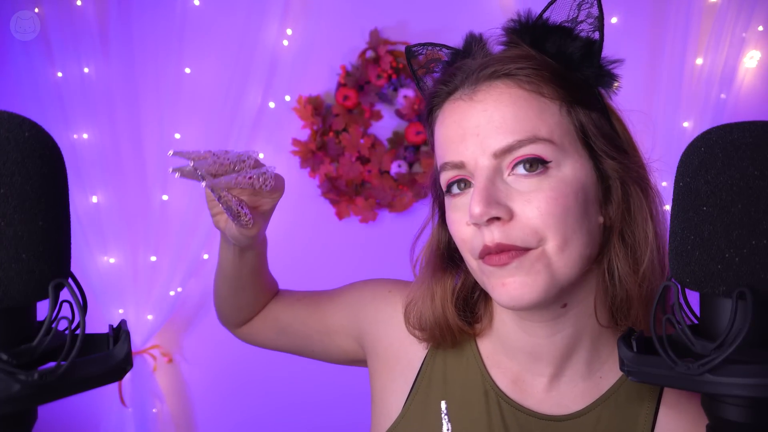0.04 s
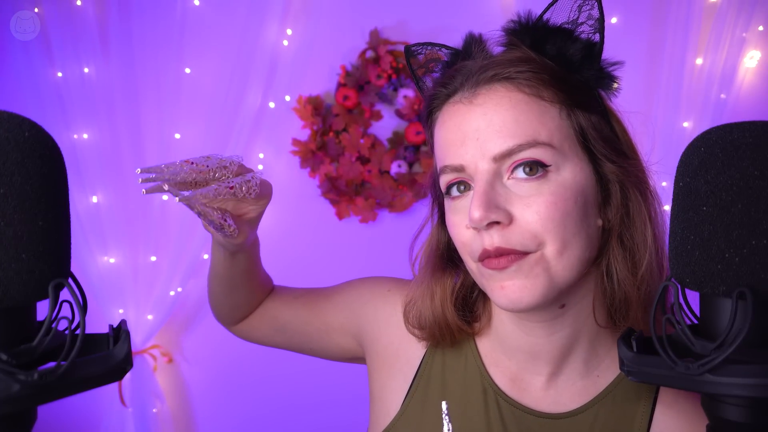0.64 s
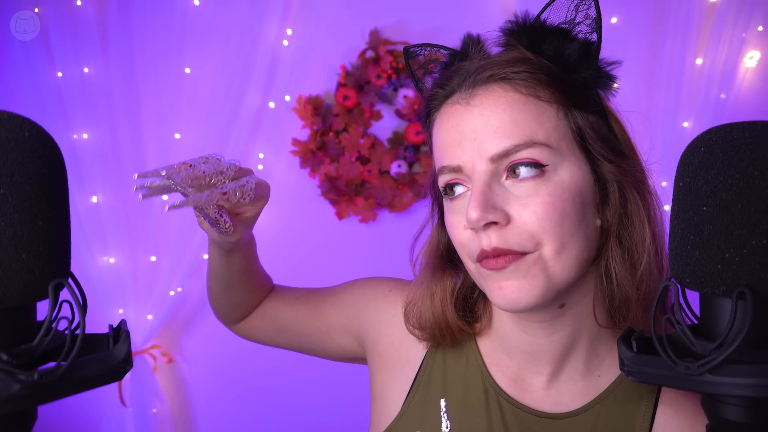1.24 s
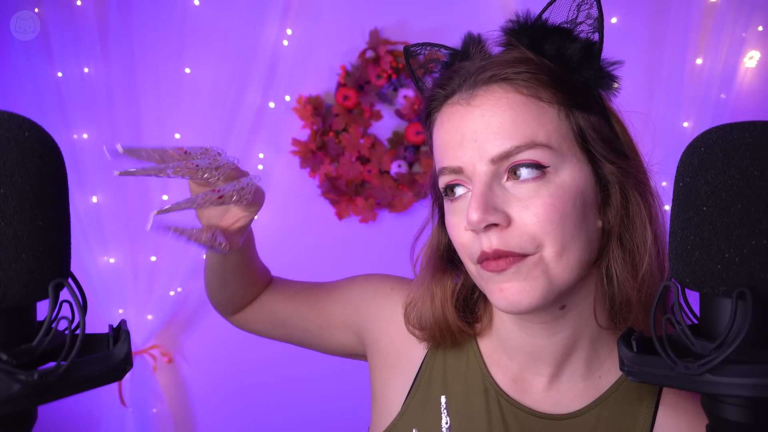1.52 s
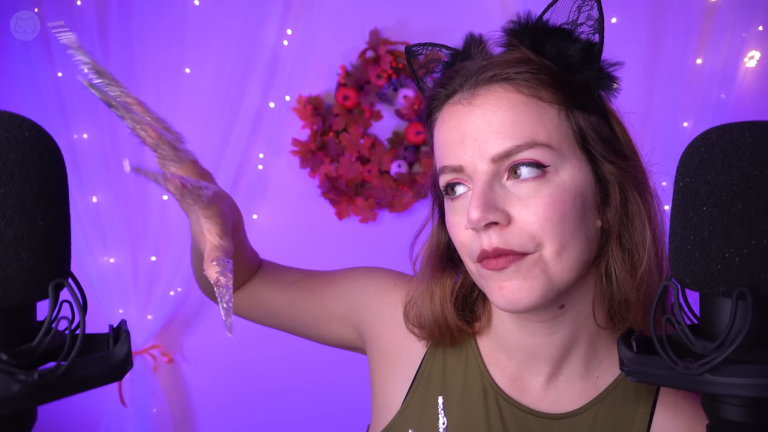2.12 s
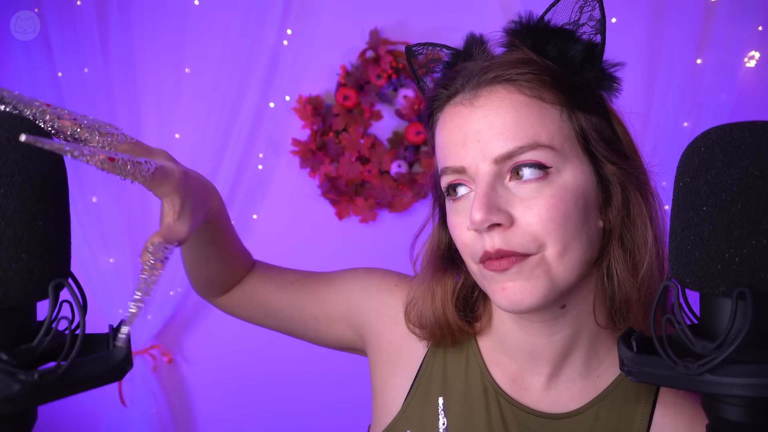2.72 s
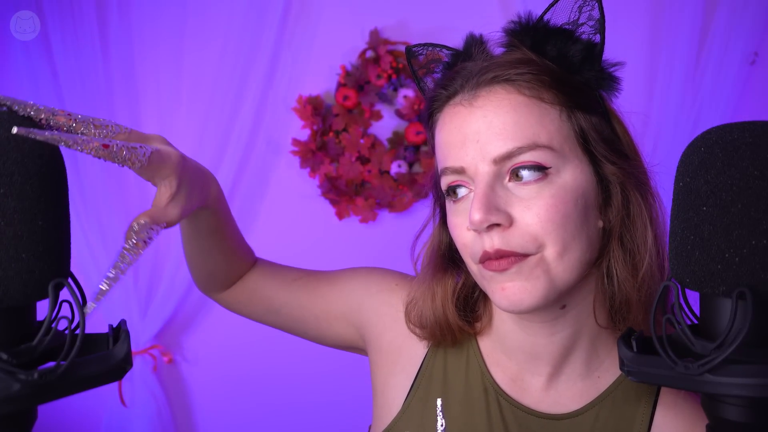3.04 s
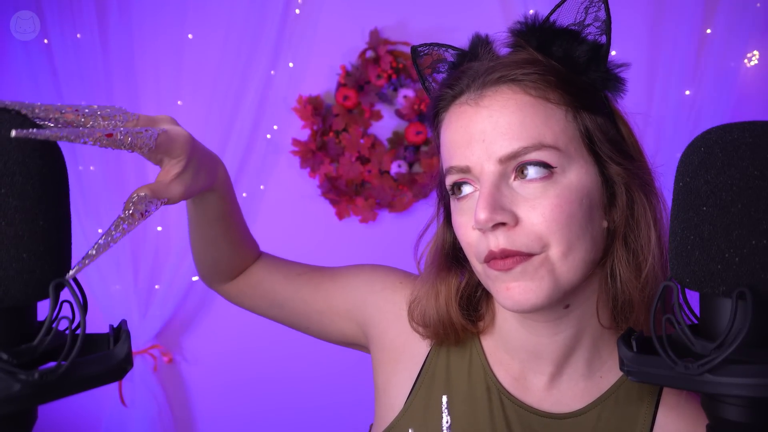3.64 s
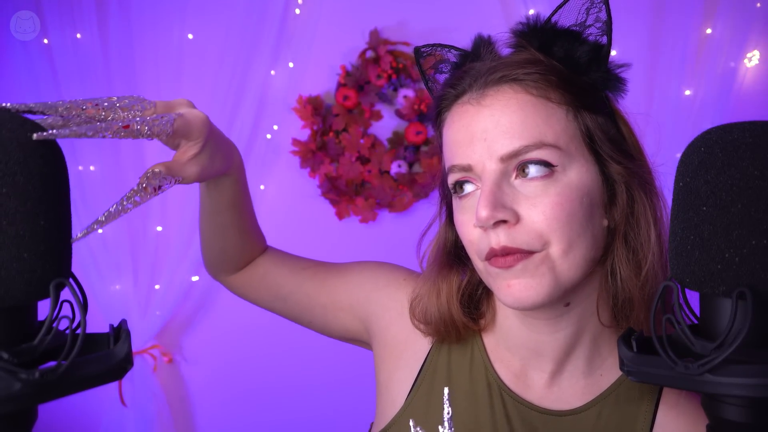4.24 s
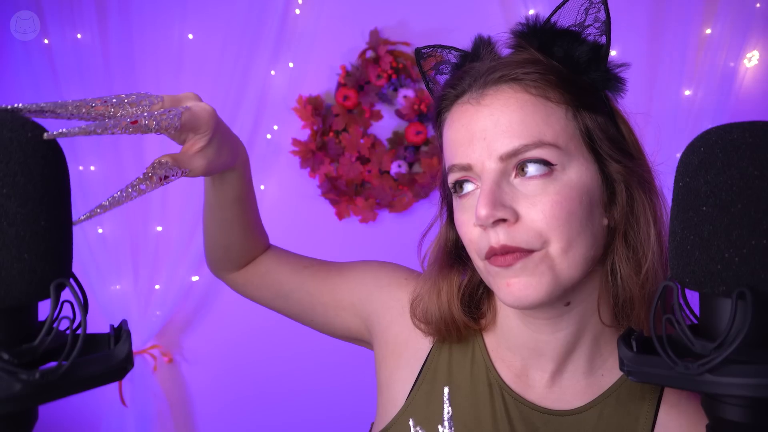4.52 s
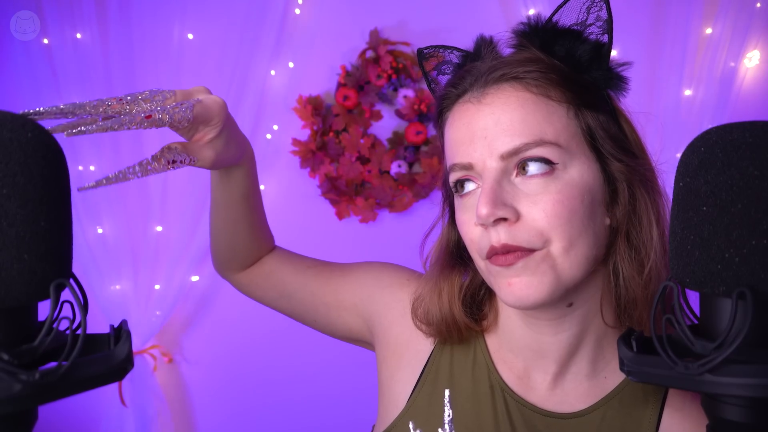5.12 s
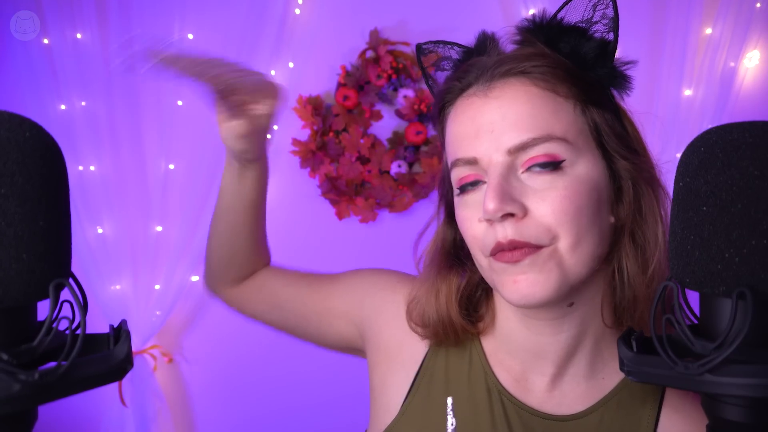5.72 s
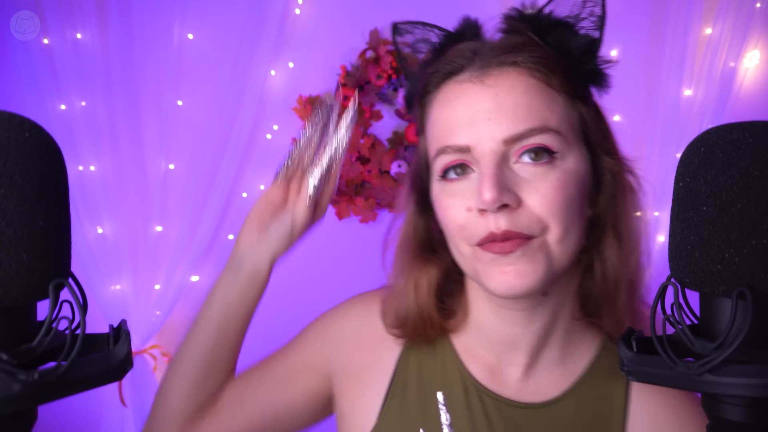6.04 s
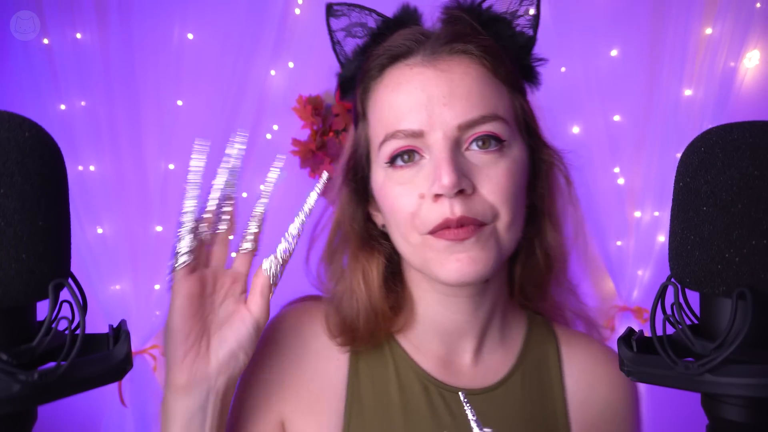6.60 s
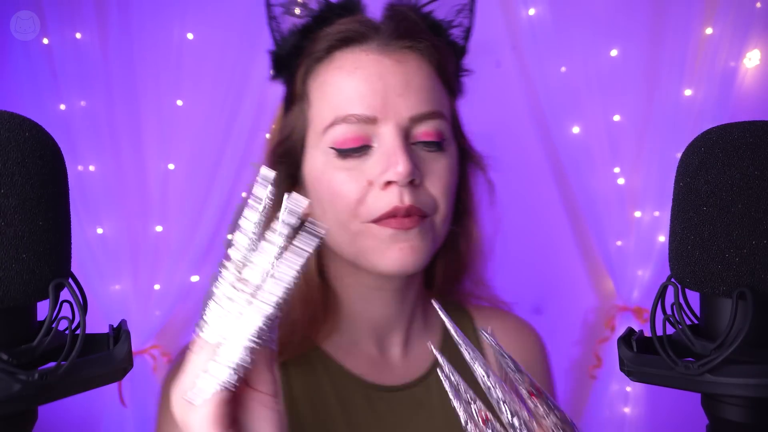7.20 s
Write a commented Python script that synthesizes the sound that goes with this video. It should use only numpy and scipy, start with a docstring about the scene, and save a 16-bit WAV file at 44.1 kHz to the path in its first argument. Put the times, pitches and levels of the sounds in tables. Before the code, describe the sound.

Hollow metal claw rings click and slide against each other in small, bright clusters, mostly on the left. After a pause, the claws drag over the foam cover of the left microphone in short pulls, rasping and crackling very close, with a deep rumble from its mount. They lift away, arms rustle faintly against hair and cloth, and the claws click and tinkle again. The room is quiet.

```python
"""A quiet room, where hollow metal claw rings click and slide together between two foam-covered microphones.
Impacts excite the claws' modes and cavities; ridges passing over ridges chatter. Then the claws drag
over the left microphone's foam: stick-slip friction makes it rasp and crackle, drives the resonances
of the body and shakes the springy mount. The hand draws back, the microphone's arm rocks and settles,
and the claws click again. Moving arms rustle against hair and cloth before and after the dragging."""
import sys
import numpy as np
from scipy import signal
from scipy.fft import rfft, irfft
from scipy.io import wavfile
from scipy.ndimage import uniform_filter1d

SR = 44100
rng = np.random.default_rng(int(sys.argv[2]) if len(sys.argv) > 2 else 0)


def persist_wave(psi):
    """Save psi, clipped to +-1, as 16-bit WAV."""
    counts = np.round(np.clip(psi, -1, 1) * 32767).astype(np.int16)
    wavfile.write(sys.argv[1], SR, np.atleast_2d(counts).T)


N = 325017
TIME = np.arange(N) / SR
TOUCH_S, LIFT_S = 2.89, 5.516  # the claws land on the foam and leave it

# Levels in all tables are relative: each source adds its own gain.
# sparkle near 12 kHz, lost while the claws are held beside the head: time_s, gain_db
SPARKLE = [(1.5, -6.5), (5.7, -4.5), (6.17, -9), (6.29, 0.5), (6.65, -8), (7.1, -2.5)]
# one claw slides along another: start_s, end_s, level_db
SLIDES = [(0.875, 0.939, -57), (1.28, 1.34, -48.5), (1.505, 1.558, -54.5), (5.684, 5.743, -47),
          (5.766, 5.84, -55), (5.89, 5.946, -60), (6.154, 6.202, -42), (6.248, 6.353, -44.5),
          (6.524, 6.594, -55.5), (6.625, 6.714, -47.5)]
# how the hand faces the microphones: time_s, left_over_right_db
HAND_PAN = [(0.9, 10), (1.3, 13), (1.55, -4), (5.7, 6), (5.8, 0), (5.9, 6), (6.17, -1), (6.28, 8),
            (6.6, -3), (7.2, 8.5)]
# pulls of the claws through the foam: start_s, end_s, friction_db
PULLS = [(2.896, 2.992, -64), (3.098, 3.138, -62), (3.271, 3.425, -63.5), (3.487, 3.505, -55.5),
         (3.612, 3.669, -55), (3.691, 3.747, -56), (3.777, 3.858, -59.5), (3.97, 4.243, -59.5),
         (4.267, 4.41, -56.5), (4.502, 4.563, -56), (4.621, 4.765, -57), (4.793, 4.877, -57),
         (4.904, 5.017, -55.5), (5.047, 5.135, -54), (5.187, 5.299, -58.5), (5.361, 5.416, -54),
         (5.413, 5.505, -49)]
# spectrum of a claw's edge rasping in the foam: frequency_hz, gain_db
RASP_SPECTRUM = [(500, -45), (1000, -2), (1400, 2.5), (1800, -4), (2300, -13.5), (3400, -15.5),
                 (6000, -26.5)]
# the sides of the claws glide over the foam without catching: time_s, friction_db
GLIDE_FRICTION = [(3.2, -85), (3.25, -73), (3.46, -78), (3.58, -63), (3.68, -61.5), (3.93, -60),
                  (4.03, -56), (4.2, -60.5), (4.25, -68), (4.31, -56.5), (4.48, -57), (4.66, -63.5),
                  (4.79, -74), (4.96, -66), (5.32, -74), (5.48, -65)]


def amp(db):
    """Decibels to amplitude ratio."""
    return 10 ** (np.asarray(db) / 20)


def unit_rms(x):
    """Normalisation to rms 1."""
    return x / np.sqrt(np.mean(x ** 2) + 1e-20)


def at_hz(points, hz):
    """Interpolation on a log-frequency axis."""
    knots_hz, values = np.transpose(points)
    return np.interp(np.log(hz + 1), np.log(knots_hz + 1), values)


def at_time(curve, s):
    """Linear interpolation of each column at time s."""
    times, *columns = np.transpose(curve)
    return [np.interp(s, times, column) for column in columns]


def add(mix, s, sound):
    """Superposition of a sound at time s."""
    part = mix[..., max(round(s * SR), 0):][..., :sound.shape[-1]]
    part += sound[..., :part.shape[-1]]


def colour(x, spectrum, size=2048):
    """Minimum-phase filtering: being causal, it keeps attacks sharp."""
    log_gain = np.log(amp(at_hz(spectrum, abs(np.fft.fftfreq(size, 1 / SR)))))
    taps = np.fft.ifft(np.exp(np.conj(signal.hilbert(log_gain)))).real
    return signal.fftconvolve(x, taps[:size // 2])[:len(x)]


def noise(spectrum):
    """Stationary Gaussian noise of a given spectrum, rms 1."""
    gain = amp(at_hz(spectrum, np.fft.rfftfreq(N, 1 / SR)))
    return unit_rms(irfft(rfft(rng.standard_normal(N)) * gain, N))


def grains(per_s, spread_db):
    """A Poisson train of impulses of uneven size."""
    size = amp(spread_db * np.minimum(rng.exponential(1, N), 4)) * rng.choice([-1, 1], N)
    return size * (rng.random(N) < per_s / SR)


def scatter(start, end, per_s):
    """Jittered times: one random moment in each equal part of a span."""
    count = max(round((end - start) * per_s), 1)
    return start + (end - start) * (np.arange(count) + rng.random(count)) / count


def swell(start, end):
    """A raised-cosine rise and fall."""
    return np.sin(np.pi * np.clip((TIME - start) / (end - start), 0, 1)) ** 2


def sides(pan_db):
    """A level difference as left and right gains of mean 1."""
    gains = amp([[pan_db / 2], [-pan_db / 2]])
    return gains / gains.mean()


def room_tone(air_db=-67, left_db=-41, right_db=-47, stirred_db=-37):
    """Uncorrelated air noise at each microphone, over the sway of the stands; draughts stir the left one."""
    # quiet air and the slow sway of the stands: frequency_hz, gain_db
    air_spectrum = [(35, -41), (60, -12.5), (142, -3), (168, -17), (202, -9), (227, -20), (268, -16),
                    (354, -22), (448, -22.5), (553, -19.5), (991, -21), (1510, -28), (3940, -32.5),
                    (16000, -33.5)]
    sway_spectrum = [(5, -17.5), (14, -7.5), (20, -9), (30, -29.5), (50, -36.5), (100, -51.5), (400, -110)]
    # the hand opens or swings and moves the air: start_s, end_s, level_db
    draughts = [(1.26, 2.07, 4.5), (5.297, 6.594, -3.5)]
    stirring = sum(amp(db) * swell(start, end) for start, end, db in draughts)
    sways = amp(left_db) + amp(stirred_db) * stirring, amp(right_db)
    return np.array([noise(air_spectrum) * amp(air_db) + noise(sway_spectrum) * sway for sway in sways])


def contact(decay_s, rise_s, size=512):
    """A brief contact gives a broadband force: a noise burst with exponential decay."""
    t = np.arange(size) / SR
    return rng.standard_normal(size) * np.exp(-t / decay_s) * (1 - np.exp(-t / rise_s))


def claw_response(forces, ring_db, vary_db=3.5, detune=0.0068):
    """Modal response: a direct snap plus damped modes whose strength depends on where the claw is struck."""
    # modes of a hollow claw: frequency_hz, level_db, t60_s
    modes = [(1070, 0, 0.05), (1856, 4, 0.028), (2400, 1, 0.022), (3190, 1, 0.035), (3900, -3, 0.025),
             (4590, 1, 0.025), (6490, 0, 0.035), (7800, -4, 0.05), (8150, -3, 0.055), (9400, 3, .05),
             (10400, -15, 0.17), (10400, -22, 0.037), (11900, -9, 0.07), (12800, -26, .11),
             (11600, -18, 0.17), (12400, -21, .11), (13270, -8, 0.075), (14600, -6, 0.072)]
    # spectrum of a claw's click: frequency_hz, gain_db
    click_spectrum = [(200, -21), (600, -21.5), (1500, -18.5), (2500, -18), (3800, -17), (5300, -14),
                      (6700, -8), (9000, -6), (10800, 0.5), (12200, 9), (13200, -2), (14500, -6.5),
                      (15700, -13), (17000, -56)]
    t = np.arange(SR // 6) / SR
    deviations = rng.standard_normal((len(modes), 2))
    tuning = rng.uniform(0.93, 1.035)  # no two claws are the same size
    ring = np.zeros(len(t))
    for (hz, db, t60), (strength, shift) in zip(modes, deviations):
        envelope = amp(ring_db + db + vary_db * strength - 60 * t / t60)
        ring += envelope * np.cos(2 * np.pi * hz * tuning * (1 + detune * shift) * t)
    ring[0] += 1  # the direct snap
    return np.array([colour(signal.fftconvolve(force, ring), click_spectrum) for force in forces])


def cavity_ring(hz, t60_s=0.015, rise_s=0.0003, size=2048):
    """Cavity resonance: a claw's hollow rings briefly at the pitch of the struck place, with energy 1."""
    t = np.arange(size) / SR
    envelope = amp(-60 * t / t60_s) * (1 - np.exp(-t / rise_s))
    return unit_rms(np.sin(2 * np.pi * hz * t) * envelope) / np.sqrt(size)


def claw_clicks(gain_db=16.5, low_gain_db=19, cavity_db=-3, unshared=0.62, delay_s=0.00058, lag_s=0.0008):
    """Impacts excite the modes and cavity of a claw; the sound reaches the right microphone lag_s later."""
    # claw meets claw: time_s, level_db, clack_db, cavity_hz, left_over_right_db
    impacts = [(0.3147, -41.5, -20.5, 1570, 10), (0.3315, -45, -18, 2960, 13),
               (0.384, -33.5, -19, 2430, 10), (0.391, -29.5, -24, 1680, 8), (0.3975, -34.5, -22, 1610, 17),
               (0.4117, -41, -28, 1600, 13), (0.494, -36, -33, 960, 13), (0.5036, -33.5, -28.5, 1010, 4),
               (0.509, -38, -31, 1030, 14), (0.5162, -37.5, -32, 1150, 14), (0.769, -45.5, -17, 1600, 10),
               (0.7856, -24.5, -15, 2430, 11), (0.7977, -32.5, -16.5, 1190, 11),
               (0.8801, -25, -20, 2130, 8), (0.9012, -30.5, -24, 1680, 14), (0.919, -39, -23, 960, 9),
               (1.23, -41, -13.5, 1570, 9), (1.2701, -24.5, -21, 1630, 16), (1.279, -38, -17, 1660, 12),
               (1.2948, -30.5, -22.5, 1620, 11), (1.3151, -31, -30, 2010, 14), (1.33, -41, -32, 2690, 10),
               (1.398, -31.5, -20.5, 3180, 15), (1.4066, -32, -15.5, 1090, 6), (1.441, -35, -20, 2600, 9),
               (1.502, -23, -29.5, 2560, 9), (1.506, -23, -30, 2430, 6), (1.531, -29, -23, 1420, 8),
               (1.5416, -25.5, -23.5, 2480, 11), (1.55, -30, -29, 2430, 9), (2.4382, -41, -14, 2050, -3),
               (5.685, -25, -19.5, 3300, 5), (5.6962, -28, -18, 3230, 8), (5.7128, -28, -24, 1580, 9),
               (5.7225, -42, -15, 2260, 0), (5.7745, -37, -17, 1860, -1), (5.783, -34.5, -22, 2570, 9),
               (5.7986, -34, -21.5, 1840, -4), (5.814, -39, -30, 1200, -1), (5.888, -31, -17.5, 1120, 4.5),
               (5.9243, -46, -15, 945, 5), (5.934, -45, -16, 1510, 0), (6.1599, -30.5, -22, 1930, 2),
               (6.1719, -26.5, -27, 1830, -10), (6.213, -33.5, -20, 1890, -1), (6.2541, -35, -21, 2350, 19),
               (6.2893, -29.5, -22, 3170, 12), (6.3109, -29, -20, 3110, 13), (6.3181, -31, -16, 3150, 7),
               (6.3363, -39, -17, 2490, 9), (6.4677, -44, -21, 2770, 5), (6.5485, -35, -28, 1900, -4),
               (6.5564, -38, -24, 2840, -2), (6.6137, -34.5, -19, 1908, -6),
               (6.6487, -35, -16.5, 2247, -14), (7.108, -43, -12.5, 2940, 7),
               (7.1618, -31.5, -18.5, 2170, 7.5), (7.2257, -40.5, -12, 2270, 2),
               (7.2516, -36.5, -14.5, 2360, 8), (7.354, -29.5, -18.5, 1700, 6)]
    out = np.zeros((2, N))
    for s, level_db, clack_db, cavity_hz, pan_db in impacts + claw_skips():
        (top_db,) = at_time(SPARKLE, s)
        low_db = clack_db + low_gain_db
        mid_db = 0.51 * low_db  # the middle band partly follows the clack
        tone = [(2500, low_db), (4000, low_db), (5500, mid_db), (8500, mid_db),
                (10500, 0), (12000, top_db), (14000, 0)]
        left_force = contact(decay_s=0.00058, rise_s=0.0001)
        right_force = left_force * (1 - unshared) + contact(decay_s=0.0022, rise_s=0.00012) * unshared
        pair = claw_response([left_force, right_force], ring_db=-41.5)
        pair = np.array([colour(side, tone, size=512) for side in pair])
        pair /= np.linalg.norm(pair, axis=1, keepdims=True)
        add(pair, 0, cavity_ring(cavity_hz) * amp(clack_db + cavity_db))
        pair *= sides(pan_db) * amp(level_db + gain_db)
        add(out[0], s + delay_s, pair[0])
        add(out[1], s + delay_s + lag_s, pair[1])
    return out


def reverberation(x, wet_db=-13, gap_s=0.0013, echoes_per_s=5000):
    """A diffuse field: sparse reflections, equally loud on both sides, die fastest in the top treble."""
    # reverberation time of the room: frequency_hz, t60_s
    decay_times = [(500, 0.22), (2500, 0.37), (7000, 0.23), (12000, 0.17), (16000, 0.036)]
    echoes = rng.choice([-1., 1.], (2, SR // 2)) * (rng.random((2, SR // 2)) < echoes_per_s / SR)
    echoes[:, :round(gap_s * SR)] = 0
    hz, t, spectra = signal.stft(echoes, SR, nperseg=256)
    decay = amp(-60 * t / at_hz(decay_times, hz)[:, None])
    _, tail = signal.istft(spectra * decay, SR, nperseg=256)
    tail /= np.linalg.norm(tail[0])
    return amp(wet_db) * signal.fftconvolve(x.mean(0)[None], tail, axes=1)[:, :N]


def claw_slides(gain_db=-1, fade_db=3.5, top_db=-3.5, trip_s=0.0005, steady=0.22, lag_s=0.00073):
    """Roughness excitation: the ridges of two claws trip over each other hundreds of times a second."""
    trip = np.exp(-np.arange(256) / SR / trip_s)
    roughness = signal.fftconvolve(abs(grains(per_s=900, spread_db=3)), trip)[:N] + steady
    chatter = roughness * rng.standard_normal((2, N))
    out = np.zeros((2, N))
    for start, end, db in SLIDES:
        (pan_db,) = at_time(HAND_PAN, (start + end) / 2)
        (sparkle_db,) = at_time(SPARKLE, start)
        force = chatter[:, round(start * SR):round(end * SR)]
        size = force.shape[1]
        envelope = amp(np.linspace(0, -fade_db, size)) * signal.windows.tukey(size, 0.15)
        tone = [(8000, 0), (11500, sparkle_db + top_db), (14000, top_db)]
        pair = claw_response(force * envelope, ring_db=-39.5)
        pair = np.array([colour(side, tone, size=512) for side in pair])
        pair *= np.sqrt(size) / np.linalg.norm(pair, axis=1, keepdims=True)
        pair *= sides(pan_db) * amp(db + gain_db)
        add(out[0], start, pair[0])
        add(out[1], start + lag_s, pair[1])
    return out


def claw_skips(gain_db=4, spread_db=1.5, clack_db=-19, cavity_range_hz=(1670, 3410)):
    """Intermittent contact: sliding claws skip and land again, giving further rows of impacts."""
    rows = []
    for start, end, db in SLIDES:
        for s in scatter(start, end, per_s=55):
            level_db = db + gain_db + spread_db * rng.standard_normal()
            rows.append((s, level_db, clack_db, rng.uniform(*cavity_range_hz), *at_time(HAND_PAN, s)))
    return rows


def arm_brushing():
    """Friction noise swells as the arms swing out and back past hair and cloth."""
    # swings of the arms: start_s, end_s, level_db, low_rustle_db
    swings = [(2.27, 2.55, -67.5, -1), (5.534, 6.386, -65.5, -3), (6.217, 6.937, -68.5, -14)]
    # spectrum of the rustle: frequency_hz, gain_db
    rustle_spectrum = [(150, -45), (380, 21), (700, -5), (1400, -3), (2400, 2), (4000, -3.5), (7000, 0.5),
                       (11000, -2.5), (16000, -17)]
    rustle = [noise(rustle_spectrum) for _ in range(2)]
    out = np.zeros((2, N))
    for start, end, db, low_db in swings:
        out += [colour(side * amp(db) * swell(start, end), [(450, low_db), (1500, 0)]) for side in rustle]
    return out


def pull_envelopes(bite_s=0.0047, release_s=0.005, fade_db=3.5):
    """Friction, rasp and fizz amplitudes over time: each pull bites, eases off and lets go."""
    # brightness relative to friction as the tips dig in and ease out: time_s, rasp_db, fizz_db
    brightness = [(3.0, -16, -43), (3.35, -2.5, -13), (3.65, -6.5, -16), (4.0, -8.5, -5), (4.35, -3, -12.5),
                  (5.1, -21, -15), (5.5, -8.5, -13)]
    friction = np.zeros(N)
    for start, end, db in PULLS:
        bite = np.clip((TIME - start) / bite_s + 0.5, 0, 1)
        release = np.clip((end - TIME) / release_s + 0.5, 0, 1)
        progress = np.clip((TIME - start) / (end - start), 0, 1)
        friction += bite * release * amp(db + fade_db * (1.5 - progress))
    rasp_db, fizz_db = at_time(brightness, TIME)
    return friction, friction * amp(rasp_db), friction * amp(fizz_db)


def mount_rumble(gain_db=-23, effort_exponent=0.37, rise_s=0.019, fall_db_per_s=89):
    """Forced vibration: the harder the hand pulls, the more the springy left mount swings."""
    # response of the mount: frequency_hz, gain_db
    mount_spectrum = [(8, -21.5), (18, -6), (27, -1), (36, -3.5), (42, -5.5), (50, -20), (61, -49),
                      (72, -36), (88, -30), (103, -36), (120, -58), (300, -100)]
    friction = np.hypot(pull_envelopes()[0], amp(at_time(GLIDE_FRICTION, TIME)[0]))
    effort = abs(uniform_filter1d(friction, size=SR // 4))
    effort = np.interp(np.clip(TIME, TOUCH_S, LIFT_S), TIME, effort / effort.max())
    onset = np.clip((TIME - TOUCH_S) / rise_s, 0, 1)
    decay = amp(-fall_db_per_s * np.maximum(TIME - LIFT_S, 0))
    push = effort ** effort_exponent * onset * decay
    swing = signal.hilbert(noise(mount_spectrum))
    swing = swing.real / uniform_filter1d(abs(swing), size=2000) ** 0.85  # the grip evens out the swings
    return np.array([2 * unit_rms(swing) * push * amp(gain_db), np.zeros(N)])


def microphone_body(force):
    """Modal response of the microphone: each resonance rings like two equal resonators in cascade."""
    # resonances of the microphone and its arm: frequency_hz, width_hz, level_db
    resonances = [(89, 14.3, 21.5), (149, 10, -9), (156.3, 37.7, 14.5), (205.4, 10, 10), (272.3, 10, 8),
                  (333.4, 14, 5.5), (417.7, 19, 5.5), (464, 55, -36), (550, 41.7, 16), (708, 93, 7.5),
                  (804, 152, 7), (940, 180, 7.5), (1260, 370, -4)]
    t = np.arange(SR // 4) / SR
    ring = sum(amp(db) * width ** 2 * t * np.exp(-1.5 * np.pi * width * t) * np.sin(2 * np.pi * hz * t)
               for hz, width, db in resonances)
    return signal.fftconvolve(force, ring / np.linalg.norm(ring))[:N]


def foam_glide(body_db=-3, rasp_db=-5, hiss_db=-13, far_db=-15, patchy_db=4, patch_s=0.012):
    """Sliding friction: dense, even slips merge into a soft rasp with a fine, patchy hiss on top."""
    # spectrum of the hiss: frequency_hz, gain_db
    hiss_spectrum = [(1000, -25), (2500, -27), (4200, -17), (6500, -1), (8800, -6), (10300, -3), (11800, 2),
                     (13200, -9), (16000, -24)]
    landed = np.clip((TIME - TOUCH_S) / 0.011 + 0.5, 0, 1)
    lifted = np.clip((TIME - LIFT_S) / 0.017, 0, 1)
    friction = amp(at_time(GLIDE_FRICTION, TIME)[0]) * landed * (1 - lifted)
    slips = unit_rms(grains(per_s=4500, spread_db=4))
    hiss = np.array([unit_rms(colour(grains(per_s=2200, spread_db=5), hiss_spectrum)) for _ in range(2)])
    flicker = unit_rms(uniform_filter1d(rng.standard_normal(N), size=round(patch_s * SR)))
    patches = unit_rms(amp(patchy_db * flicker))
    out = hiss * patches * friction * amp(hiss_db) * amp([[0], [far_db]])
    out[0] += colour(microphone_body(slips * friction), [(100, 5), (400, 7.5)]) * amp(body_db)
    out[0] += unit_rms(colour(slips, RASP_SPECTRUM)) * friction * amp(rasp_db)
    return 2 * out


def foam_rub(rasp_db=-3, airborne_db=-20):
    """Stick-slip friction drives the left microphone's body; a little reaches the right through the air."""
    friction, rasp, _ = pull_envelopes()
    slips = grains(per_s=1200, spread_db=6.5)
    rub = microphone_body(unit_rms(slips) * friction)
    rub += unit_rms(colour(slips, RASP_SPECTRUM)) * rasp * amp(rasp_db)
    airborne = microphone_body(unit_rms(grains(per_s=2000, spread_db=11)) * friction)
    return np.array([2 * rub, airborne * amp(airborne_db)])


def foam_catches(knock_db=6.5, spread_db=1):
    """Small random catches scale with the friction of each pull, giving further rows of snags."""
    return [(s, *(np.array([db, db + knock_db, 0]) + spread_db * rng.standard_normal(3)))
            for start, end, db in PULLS for s in scatter(start, end, per_s=22)]


def foam_crackle(fizz_db=-3, snap_gain_db=-7, knock_gain_db=18, crack_db=3, top_db=-4, far_db=-11):
    """Sudden elastic release: pores flick past the tips as fizz; snags snap and knock the microphone."""
    # a claw tip snags in the foam and lets go: time_s, snap_db, knock_db, sparkle_db
    snags = [(2.929, -70, -49.5, -5), (3.113, -69, -42, -13), (3.18, -50.5, -39.5, -5),
             (3.2786, -58, -34.5, -15), (3.2986, -57, -52, -6), (3.3236, -60, -39, -11),
             (3.396, -47.5, -37.5, -13), (3.4484, -53, -45, -3), (3.4859, -60, -38, 9),
             (3.497, -58.5, -53, 8.5), (3.6282, -56, -23.5, 1), (3.638, -49.5, -40, -4.5),
             (3.6972, -49, -26.5, 6.5), (3.7253, -64, -31, 1), (3.795, -50.5, -33, 1),
             (3.819, -67, -64, 18.5), (3.862, -57, -49, 11), (3.879, -66, -55, 14), (3.932, -51.5, -31, 3),
             (3.9963, -50.5, -32.5, -13), (4.1164, -45.5, -35.5, 8), (4.217, -55.5, -31.5, 6.5),
             (4.267, -60, -36, 4), (4.3872, -47, -36, 8), (4.411, -60, -39, 11), (4.4665, -48, -35.5, 9),
             (4.5353, -55, -45, 10), (4.6467, -61, -54, 0), (4.688, -50.5, -35.5, 0),
             (4.716, -40.5, -28, -4), (4.7429, -54, -39, 9), (4.857, -47.5, -33, -7),
             (4.8658, -49, -32.5, 6), (4.905, -46, -39.5, -2), (4.9871, -50.5, -35.5, -3),
             (5.0747, -45.5, -30.5, -9), (5.0971, -47.5, -34, 6.5), (5.162, -50.5, -41.5, 4.5),
             (5.2143, -52.5, -34, -9), (5.2325, -58, -48, 5), (5.2574, -49, -32, -5),
             (5.29, -62.5, -52, 11), (5.3494, -48, -30, -2), (5.371, -52, -31, -7), (5.378, -58, -37, -8),
             (5.4291, -45.5, -33.5, -10), (5.4518, -47, -42, -14), (5.467, -43, -46, -9),
             (5.487, -54, -41, -14), (5.5142, -46.5, -35, -6)]
    # spectrum of the crackle: frequency_hz, gain_db
    foam_spectrum = [(500, -33), (1500, -2.5), (2600, -6), (4200, -5.5), (6500, 2), (8800, -5), (10300, 3),
                     (11800, 9.5), (13200, -1.5), (16000, -30)]
    *_, fizz = pull_envelopes()
    flick_decay = np.exp(-1 / (0.00046 * SR))
    flicks = signal.lfilter([1], [1, -flick_decay], abs(grains(per_s=370, spread_db=6)))
    out = np.array([unit_rms(colour(flicks * rng.standard_normal(N), foam_spectrum)) for _ in range(2)])
    out *= fizz * amp(fizz_db)
    knocks = np.zeros(N)
    for s, snap_db, knock_db, sparkle_db in snags + foam_catches():
        for side in out:
            snap = unit_rms(colour(contact(decay_s=0.0011, rise_s=0.00005), foam_spectrum))
            snap = colour(snap, [(8500, 0), (10500, sparkle_db + top_db)], size=512)
            add(side, s, snap * amp(snap_db + snap_gain_db))
        add(knocks, s, amp([knock_db + knock_gain_db]))
    out *= 2 * amp([[0], [far_db]])
    out[0] += microphone_body(knocks) + amp(crack_db) * colour(knocks, RASP_SPECTRUM)
    return out


def basket_hum():
    """Resonance: hard pulls set the left microphone's basket humming in a narrow band."""
    # swells of the hum: start_s, end_s, level_db
    hums = [(4.286, 4.395, -50), (4.47, 4.606, -46), (5.387, 5.543, -43)]
    # resonance curve of the basket: frequency_hz, gain_db
    basket_spectrum = [(380, -72), (490, -22), (545, -8), (610, -19), (800, -70)]
    envelope = sum(amp(db) * swell(start, end) for start, end, db in hums)
    return np.array([noise(basket_spectrum) * envelope, np.zeros(N)])


def claw_tinkles(low_hz=9790, high_hz=9880, t60_s=0.43, far_db=-9):
    """Beating: a freed claw rings on with two thin tones close in frequency."""
    # a claw springs free: time_s, level_db
    releases = [(4.717, -66), (4.904, -60), (6.318, -61)]
    t = np.arange(SR // 2) / SR
    ring = (np.sin(2 * np.pi * low_hz * t) + 0.5 * np.sin(2 * np.pi * high_hz * t)) * amp(-60 * t / t60_s)
    out = np.zeros(N)
    for s, db in releases:
        add(out, s, ring * amp(db))
    return out * amp([[0], [far_db]])


def microphone_arm_rock(rock_hz=7.2, level_db=-19, rise_s=0.22, fall_db_per_s=9):
    """Damped free oscillation: once let go, the arm of the left microphone rocks and settles."""
    t = np.maximum(TIME - LIFT_S, 0)
    envelope = np.minimum(t / rise_s, 1) * amp(level_db - fall_db_per_s * t)
    return np.array([np.sin(2 * np.pi * rock_hz * t) * envelope, np.zeros(N)])


def scene():
    """Superposition of all sources in stereo; only the metal sounds reverberate."""
    claws = claw_clicks() + claw_slides() + claw_tinkles()
    foam = foam_rub() + foam_glide() + foam_crackle() + basket_hum()
    reflections = reverberation(claws)
    rumble = mount_rumble() + microphone_arm_rock()
    return claws + reflections + rumble + foam + arm_brushing() + room_tone()


def record(dry):
    """Band limiting by a steep linear-phase low-pass filter."""
    cutoff_hz = 16500
    taps = signal.firwin(511, cutoff_hz, window=("kaiser", 9), fs=SR)
    return signal.oaconvolve(dry, taps[None], "same")


dry = scene()
out = record(dry)
persist_wave(out)
```